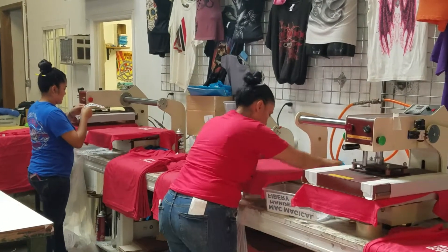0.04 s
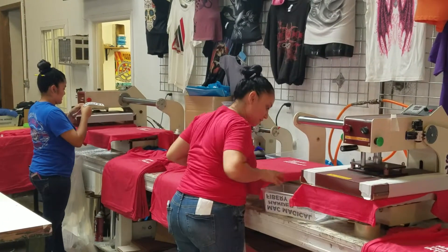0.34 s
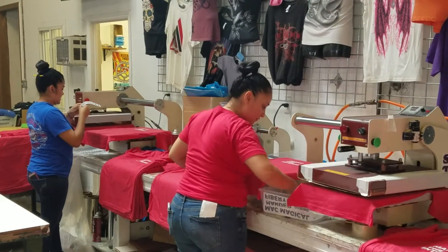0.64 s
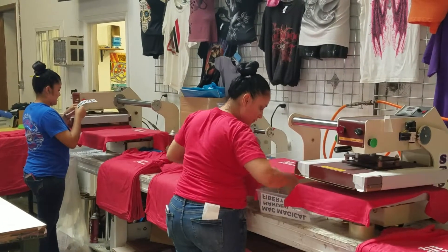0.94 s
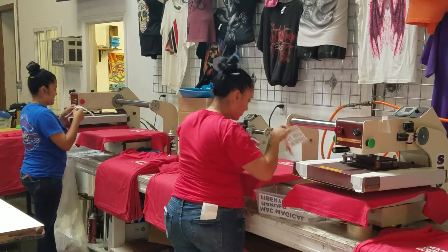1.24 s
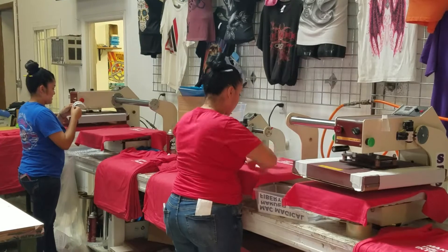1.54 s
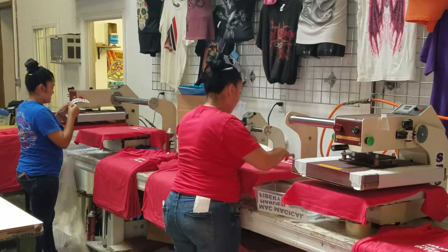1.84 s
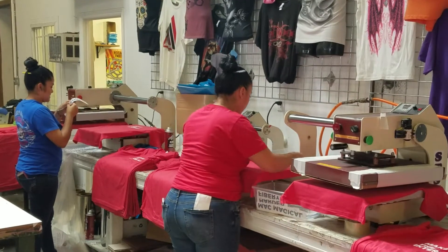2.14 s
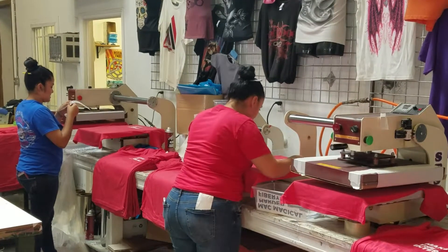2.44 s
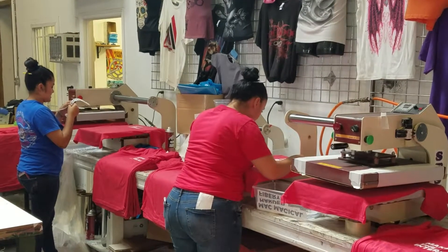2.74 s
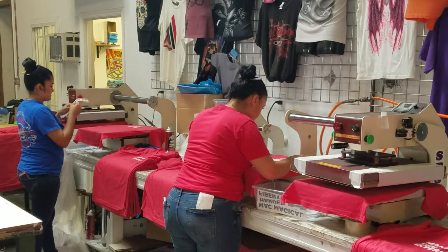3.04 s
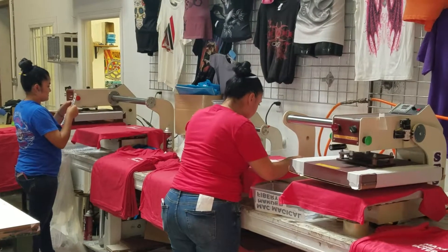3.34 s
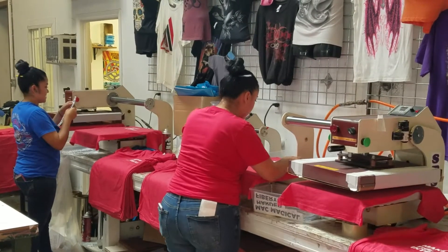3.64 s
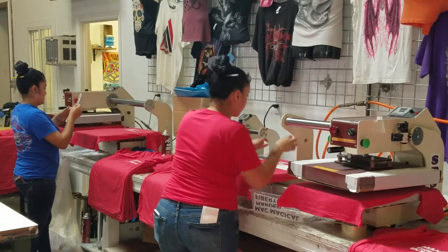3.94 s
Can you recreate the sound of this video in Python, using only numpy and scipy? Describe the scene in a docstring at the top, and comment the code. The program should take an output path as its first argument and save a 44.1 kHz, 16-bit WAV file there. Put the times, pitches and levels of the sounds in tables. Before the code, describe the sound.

Compressed air hisses and roars in uneven surges, slightly to the right, in a print workshop. Dull knocks come from the work tables early on, then short bright air spurts follow, while fans and motors drone underneath.

```python
"""A print workshop. From the start, a jet of compressed air hisses a little to the right, while motors
and fans drone underneath. The jet roars in uneven surges where it plays over a surface, now hollow,
now bright. In the first second, four dull knocks come from the work tables; low groans follow.
Bright spurts of air return after two seconds, and there is one last knock at three.
Near the end the roar sinks and the spurts come closer together."""
import sys
import numpy as np
from scipy import signal
from scipy.fft import rfft, irfft, next_fast_len
from scipy.io import wavfile
from scipy.ndimage import uniform_filter1d, map_coordinates

SR = 44100
rng = np.random.default_rng(int(sys.argv[2]) if len(sys.argv) > 2 else 0)


def inscribe(sig):
    """Save sig as 16-bit PCM at rate SR to the path in sys.argv[1].

    A 1-D sig is mono; a 2-D sig holds one channel per row.
    Samples are clipped to [-1, 1] before scaling.
    """
    pcm = np.round(np.clip(np.atleast_2d(sig).T, -1, 1) * 32767)
    wavfile.write(sys.argv[1], SR, pcm.astype(np.int16))


N = 176400  # 4 seconds

# how loud the roar is (time [s], level [dB])
ROAR_LEVEL = [(0.0, -28.5), (0.07, -24.5), (0.23, -29.5), (0.33, -27.5), (0.52, -29), (0.58, -25),
              (0.85, -26), (0.93, -23), (1.04, -28.5), (1.15, -20), (1.26, -29), (1.38, -21.5),
              (1.41, -25.5), (1.77, -25), (1.87, -22.5), (1.94, -29), (1.96, -24), (2.0, -28.5),
              (2.06, -24.5), (2.25, -30), (2.35, -22.5), (2.41, -29.5), (2.47, -25), (2.62, -31),
              (2.71, -24.5), (2.85, -28.5), (2.88, -23.5), (3.04, -25.5), (3.12, -24), (3.36, -24.5),
              (3.51, -37), (3.71, -28), (3.87, -28), (4.0, -37.5)]
# the pitch that steers the roar up and down (time [s], pitch [Hz])
ROAR_PITCH = [(.5, 2000), (.85, 1860), (1.6, 1900), (2.15, 2140), (2.7, 1970), (3.2, 1945), (3.38, 2120),
              (3.55, 2150)]
# the roar's mix of low and high (frequency [Hz], level [dB])
ROAR_COLOUR = [(300, -46), (800, -15), (1150, -6.5), (1480, -3.5), (1950, -0.5), (2400, -4), (2650, -5.5),
               (3600, -10.5), (5000, -25.5), (9000, -45)]
# how much louder the roar is on the left (frequency [Hz], left minus right [dB])
ROAR_BALANCE = [(600, -3.5), (1000, 1.5), (1400, 7), (1700, 3), (1950, 1), (2300, 0), (2800, -3), (4000, 0)]
# half-whistling peaks on the roar (frequency [Hz], boost [dB])
WHISTLES = [(1935, 3), (2140, 2)]
def roar(rest_hz=2004, whistle_width_hz=70):
    """Air strikes the surface: a broad ring slides as the jet moves, while the whistles stay put."""
    hz, times, spectrum = signal.stft(jet_noise(ROAR_BALANCE, ripple_db=1.0), SR, nperseg=512)
    slide = (np.interp(times, *np.transpose(ROAR_PITCH)) / rest_hz) ** 1.44
    spectrum = spectrum * gain(at_frequency(ROAR_COLOUR, hz[:, None] / slide))
    air = signal.istft(spectrum, SR, nperseg=512)[1][:, :N]
    def whistles(f):
        return gain(sum(db / (1 + (2 * (f - peak) / whistle_width_hz) ** 2) for peak, db in WHISTLES))
    level_db = over_time(ROAR_LEVEL) + 4.5 + 0.8 * wobble(45) + 0.5 * wobble(160)
    return unit(filtered(air, whistles)) * gain(level_db)


# how loud the hollow part is (time [s], level [dB])
HOLLOW_LEVEL = [(0, -43), (.45, -43), (.8, -34), (.92, -25.5), (1.03, -35), (1.15, -30), (1.45, -33),
                (1.6, -25.5), (1.85, -31), (2.22, -37), (2.32, -33), (2.62, -32), (2.69, -30),
                (2.82, -31.5), (3.2, -33), (3.55, -40), (4, -38)]
# its mix of low and high (frequency [Hz], level [dB])
HOLLOW_COLOUR = [(250, -29), (550, -8.5), (780, -3.5), (980, 0.5), (1250, 2.5), (1600, -4.5), (2500, -33)]
def hollow_roar():
    """The deeper, hollow part of the roar, strongest while the jet strikes squarely."""
    air = coloured(jet_noise(ROAR_BALANCE, ripple_db=1.0), HOLLOW_COLOUR)
    return air * gain(over_time(HOLLOW_LEVEL) - 0.5 + 0.6 * wobble(22.43))


# how loud the rush is (time [s], level [dB])
RUSH_LEVEL = [(0, -32), (.3, -31.5), (.55, -33), (1.5, -34), (2.05, -30.5), (2.4, -29.5), (2.6, -33.5),
              (3.25, -35), (3.38, -30), (3.53, -32.5), (3.7, -29.5), (3.9, -32), (4, -33.5)]
# its mix of low and high (frequency [Hz], level [dB])
RUSH_COLOUR = [(500, -30), (1500, -13.5), (2400, -6.5), (3100, 2.5), (3700, 0.5), (4200, -0.5), (5300, -4),
               (6200, -2.5), (7600, -8.5), (9300, -14), (12000, -22), (16000, -32)]
# how much louder rush, hiss and spurts are on the left (frequency [Hz], left minus right [dB])
JET_BALANCE = [(2000, 3), (3200, -3), (4300, -5.5), (6000, -3.5), (7000, -2.5), (8500, -2.5), (10000, -4.5),
               (10700, 5), (11700, -2), (12400, -4.5), (13500, 0), (14400, -9.5), (15400, -4.5)]
def rush():
    """The jet spreads out with a bright rush."""
    air = patchy(jet_noise(JET_BALANCE, ripple_db=2.17), depth_db=0.84)
    return coloured(air, RUSH_COLOUR) * gain(over_time(RUSH_LEVEL) + 5.5 + 0.62 * wobble(18))


# how loud the hiss is (time [s], level [dB])
HISS_LEVEL = [(0.0, -24.5), (0.36, -22.5), (1.02, -20.5), (1.12, -23), (1.27, -21), (2.3, -21.5),
              (2.82, -22), (2.88, -22), (3.33, -24), (3.45, -20.5), (3.6, -20.5), (3.83, -23.5), (3.9, -20)]
# its mix of low and high (frequency [Hz], level [dB])
HISS_COLOUR = [(5000, -41), (8500, -17.5), (9600, -14), (10400, -5), (11200, -1.5), (12000, 1), (12800, 2),
               (13600, 1), (14500, -1.2), (15300, 2.5), (16000, -5.5)]
def hiss():
    """Air leaves the nozzle with a thin, high hiss."""
    air = patchy(jet_noise(JET_BALANCE, ripple_db=0.8), depth_db=0.8)
    return coloured(air, HISS_COLOUR) * gain(over_time(HISS_LEVEL) + 4.5 + 0.5 * wobble(20))


# spurts of air (time of peak [s], pitch [Hz], level [dB], spread in time [s])
SPURTS = [(.24, 6500, -34, 0.053), (2.36, 4130, -25.5, .055), (2.92, 2850, -28.5, 0.035),
          (3.45, 6150, -28, 0.045), (3.7, 4400, -27, .025), (3.805, 2850, -24.5, .025),
          (3.86, 4400, -29, .02), (3.9, 6500, -29, 0.021)]
def spurts(octaves=0.69):
    """Short, bright, scratchy spits of air, each with its own pitch."""
    air = sum(gain(db) * burst(jet_noise(JET_BALANCE, ripple_db=3.0), hz, octaves, swell(time, spread))
              for time, hz, db, spread in SPURTS)
    return air * gain(1.5 * wobble(250))  # fast flutter makes the scratch


# how alike the jet sounds in both ears (frequency [Hz], likeness [0-1])
JET_LIKENESS = [(500, 0), (1200, 0.9), (1700, 0.27), (2000, 0.91), (2650, 0.08), (3500, 0.35), (5000, 0.25),
                (7000, 0.21), (8700, 0), (10200, 0.28), (11600, 0.05), (12700, .42), (15000, 0)]
def jet_noise(balance, ripple_db, left_delay_s=0.000424):
    """Swirling air on the right reaches the left ear later; nearby walls lift or dip its frequencies."""
    ears = np.array([[.5], [-.5]])
    ripples = rng.standard_normal((3, 400))
    ripple_hz = np.linspace(0, SR / 2, 400)
    def response(hz):
        shared, left, right = [np.interp(hz, ripple_hz, ripple) for ripple in ripples]
        walls_db = ripple_db * (shared + np.array([left, right]))
        delay = np.exp(-2j * np.pi * hz * ears * left_delay_s)
        return gain(ears * at_frequency(balance, hz) + walls_db) * delay
    return filtered(stereo_noise(JET_LIKENESS), response)


def patchy(air, depth_db):
    """Broad bands of the sound swell and sink as the swirling air shifts."""
    spectrum = signal.stft(air, nperseg=512)[2]
    patches = rng.standard_normal(spectrum.shape[1:])
    for _ in range(2):
        patches = uniform_filter1d(patches, size=12, axis=0)  # smooth across frequency
        patches = uniform_filter1d(patches, size=16, axis=1)  # and across time
    return signal.istft(spectrum * gain(depth_db * unit(patches)), nperseg=512)[1][:, :N]


# knocks on the work tables (time [s], pitch [Hz], width [octaves], level [dB])
KNOCKS = [(.238, 668, 3.1, -28), (.485, 232, 0.97, -29), (.585, 242, 0.83, -29.5), (.952, 240, 1.2, -28),
          (3.009, 360, 3, -26.5)]
def knocks(rise_s=0.004, fade_s=0.34):
    """Each dull knock is a quick blow that dies away in the room."""
    out = np.zeros((2, N))
    for start, hz, octaves, db in KNOCKS:
        age = np.maximum(np.arange(N) / SR - start, 0)
        shape = (1 - np.exp(-age / rise_s)) * gain(-60 * age / fade_s)
        out += gain(db) * burst(stereo_noise(SHOP_LIKENESS), hz, octaves, shape)
    return out


# groans and whines (time of peak [s], pitch [Hz], level [dB], spread in time [s])
GROANS = [(.7, 707, -49, 0.69), (1.07, 157.3, -37.5, .075), (1.25, 110.1, -33.5, 0.033),
          (1.63, 113, -31.5, 0.027), (1.83, 112, -34, 0.04), (1.95, 55.2, -34, .055),
          (2.28, 107, -35.5, 0.075), (3.05, 984, -46, 0.29)]
def groans():
    """The machines give low groans and faint whines: tones that come and go."""
    return sum(gain(db) * tone(hz, drift=.5) * swell(time, spread) for time, hz, db, spread in GROANS)


# how loud the fans are (time [s], level [dB])
FAN_LEVEL = [(0, -37.5), (1.4, -34.5), (2.9, -37), (3.4, -39.5), (4, -39)]
# their mix of low and high (frequency [Hz], level [dB])
FAN_COLOUR = [(15, -28), (30, -8), (45, 0.5), (70, -3.5), (115, 0), (170, -4), (230, -3), (350, -2),
              (450, -5), (600, -7), (1000, -6), (3000, -33)]
# how alike fans and knocks sound in both ears (frequency [Hz], likeness [0-1])
SHOP_LIKENESS = [(60, 0.98), (150, 0.89), (300, 0.87), (600, 0.34), (2000, 0.22)]
def fans():
    """Fans fill the shop with a low rumble."""
    return coloured(stereo_noise(SHOP_LIKENESS), FAN_COLOUR) * gain(over_time(FAN_LEVEL) + 3)


# motor hums (pitch [Hz], level [dB], waver [dB])
MOTORS = [(58, -46.5, 2), (106.5, -45, 2), (157, -50, 1.5), (211, -52, 1.5), (435.5, -51, 1)]
def motors():
    """Motors hum on steady notes that waver a little in loudness."""
    return sum(tone(hz, drift=0.39) * gain(db + waver * wobble(4.4)) for hz, db, waver in MOTORS)


# how loud the drone is (time [s], level [dB])
DRONE_LEVEL = [(0.0, -39), (0.78, -40.5), (1.01, -28.5), (1.2, -43.5), (2.47, -48), (2.62, -36),
               (3.1, -39.5), (3.44, -50), (3.58, -39), (4.0, -41.5)]
def drone():
    """One low machine note swells and fades."""
    return tone(hz=74.4, drift=0.23) * gain(over_time(DRONE_LEVEL) - 1.5)


def gain(db):
    """Turn decibels into a number to multiply by."""
    return 10 ** (np.asarray(db) / 20)


def unit(sound):
    """Scale a sound to an average strength (rms) of 1."""
    return sound / np.sqrt(np.mean(sound ** 2) + 1e-20)


def at_frequency(table, hz):
    """Read a (frequency, value) table at hz, with octaves evenly spaced."""
    frequencies, values = np.transpose(table)
    return np.interp(np.log(hz + 1), np.log(frequencies + 1), values)


def over_time(table):
    """Join (time, value) points with straight lines, one value per sample."""
    return np.interp(np.arange(N) / SR, *np.transpose(table))


def wobble(rate):
    """A smooth curve through `rate` random points a second."""
    return map_coordinates(rng.standard_normal(int(N * rate / SR) + 4), [np.arange(N) * rate / SR])


def swell(peak_s, spread_s):
    """A bell-shaped rise and fall."""
    return np.exp(-.5 * ((np.arange(N) / SR - peak_s) / spread_s) ** 2)


def tone(hz, drift):
    """A pure note whose phase wanders by about `drift` radians."""
    return np.sqrt(2) * np.sin(2 * np.pi * (hz * np.arange(N) / SR + rng.random()) + drift * wobble(3.9))


def filtered(sound, response):
    """Multiply each frequency in a sound by response(hz)."""
    size = next_fast_len(N + SR // 2)
    return irfft(rfft(sound, size) * response(np.fft.rfftfreq(size, 1 / SR)), size)[..., :N]


def coloured(sound, colour):
    """Give a sound its mix of low and high, at strength 1."""
    return unit(filtered(sound, lambda hz: gain(at_frequency(colour, hz))))


def stereo_noise(likeness):
    """White noise, partly shared by the two ears."""
    def shares(hz):
        angle = np.arccos(np.clip(at_frequency(likeness, hz), -1, 1)) / 2
        return np.array([np.cos(angle), np.sin(angle)])
    shared, opposite = filtered(rng.standard_normal((2, N)), shares)
    return np.array([shared + opposite, shared - opposite])


def burst(noise, hz, octaves, shape):
    """A band of noise around hz whose strength follows `shape`."""
    band = filtered(noise, lambda f: 1 / (1 + (2 * np.log2((f + 1) / hz) / octaves) ** 4))
    return unit(band * shape) * np.sqrt(np.mean(shape ** 2))


def scene():
    """The air jet in front, the workshop behind it."""
    jet = roar() + hollow_roar() + rush() + hiss() + spurts()
    machines = fans() + motors() + drone()
    return jet + machines + knocks() + groans()


def record(dry, top_hz=15750):
    """Cut away the very highest treble."""
    return filtered(dry, lambda hz: hz < top_hz)


dry = scene()
out = record(dry)
inscribe(out)
```